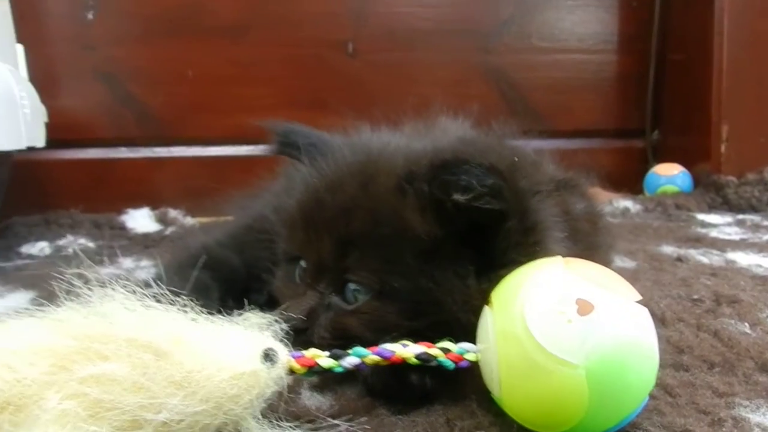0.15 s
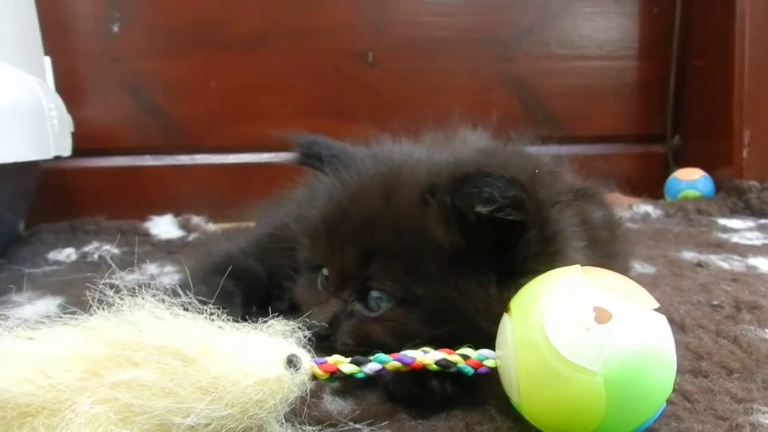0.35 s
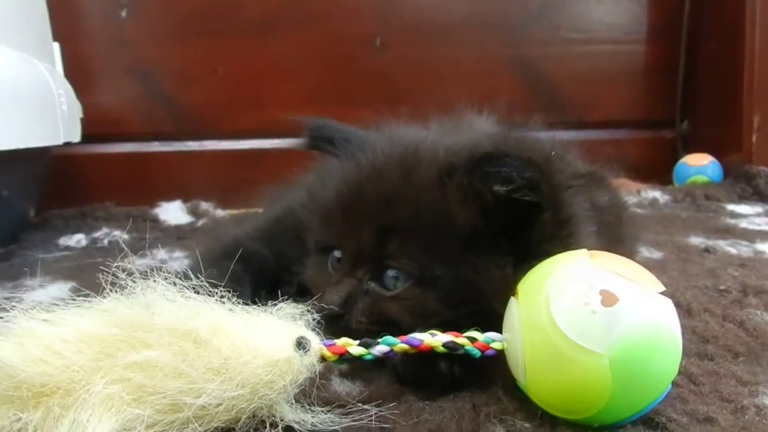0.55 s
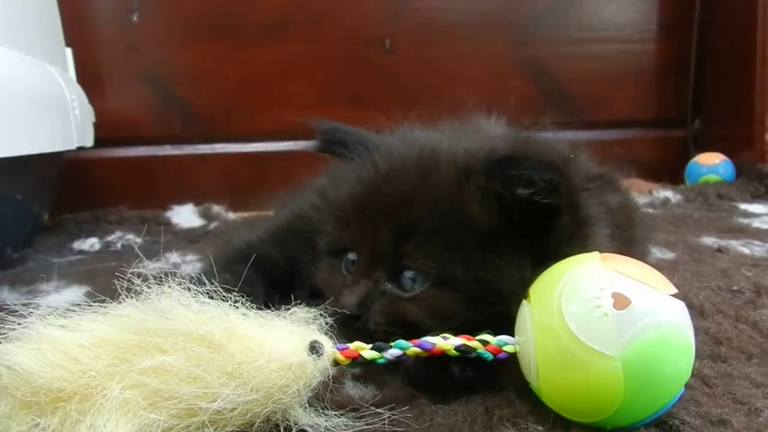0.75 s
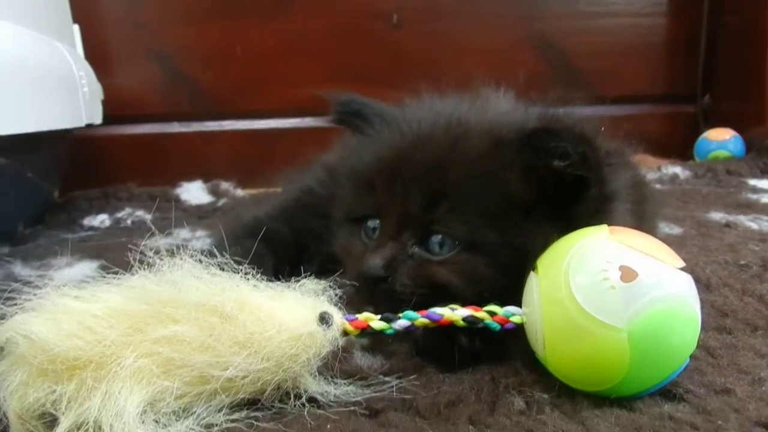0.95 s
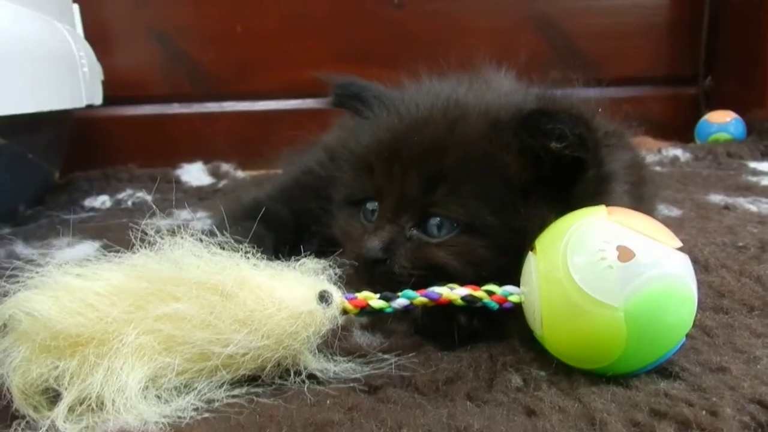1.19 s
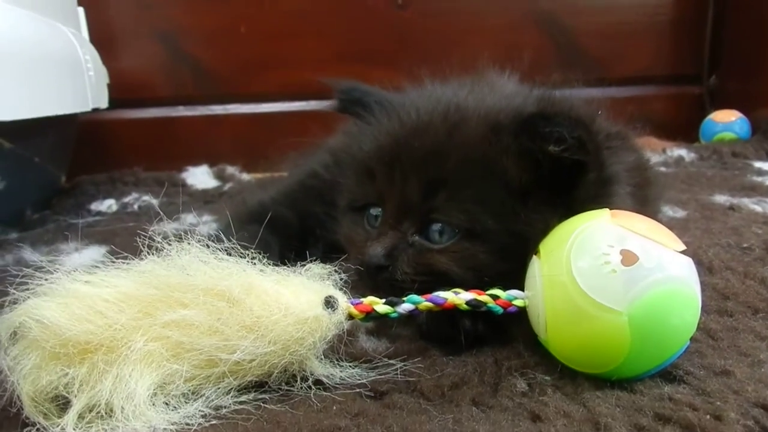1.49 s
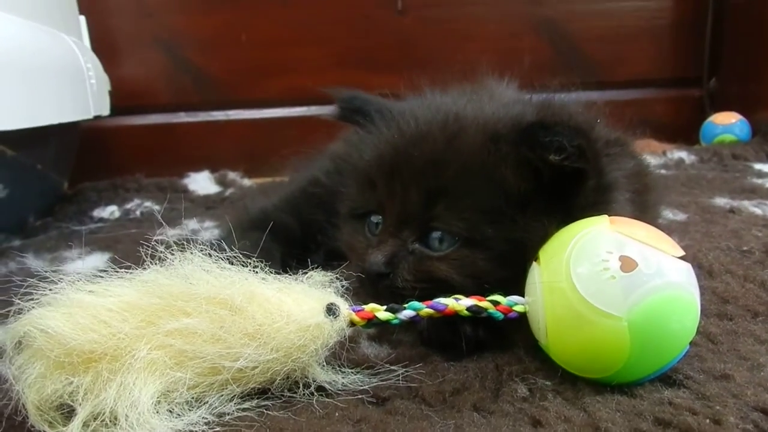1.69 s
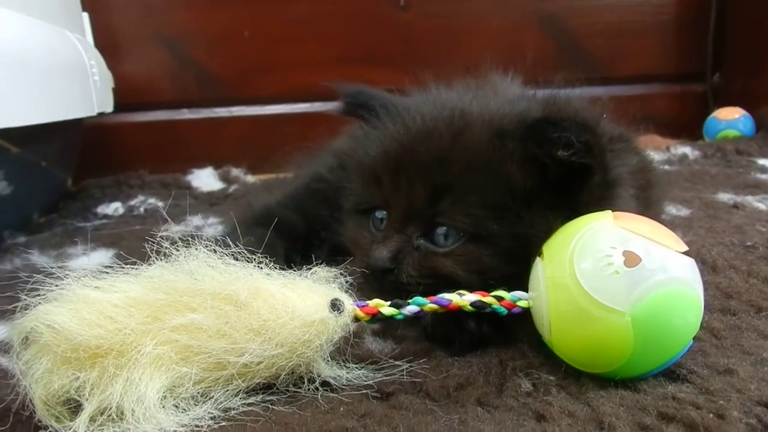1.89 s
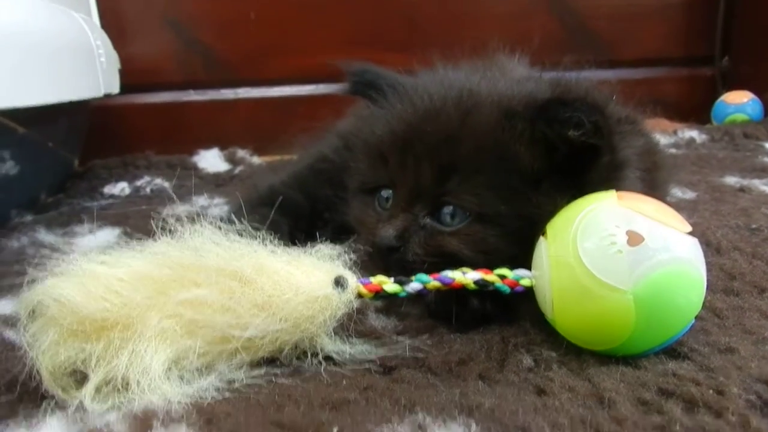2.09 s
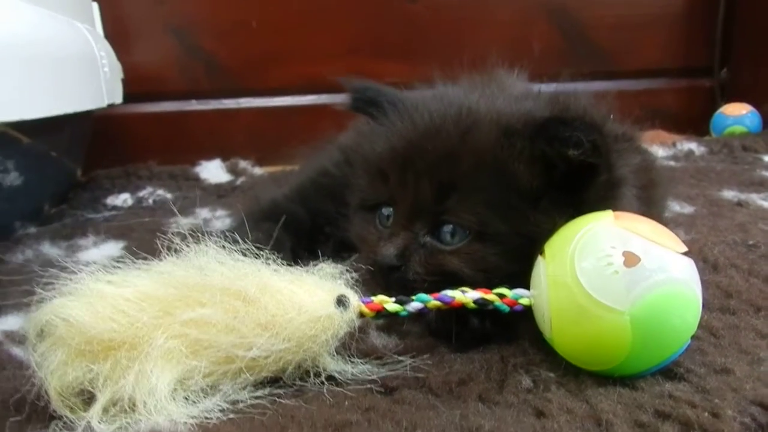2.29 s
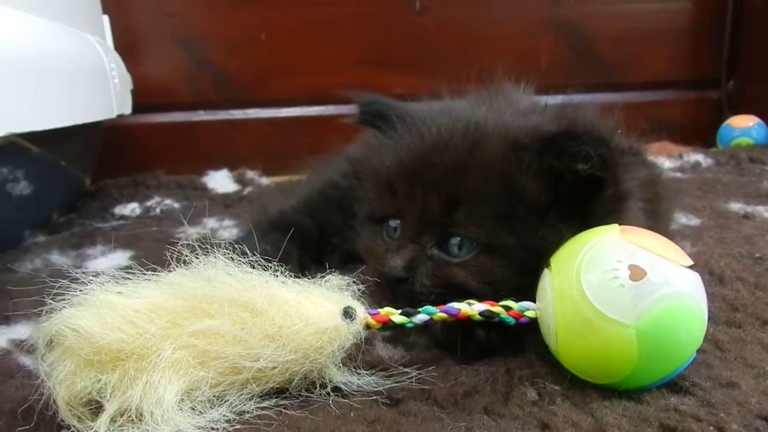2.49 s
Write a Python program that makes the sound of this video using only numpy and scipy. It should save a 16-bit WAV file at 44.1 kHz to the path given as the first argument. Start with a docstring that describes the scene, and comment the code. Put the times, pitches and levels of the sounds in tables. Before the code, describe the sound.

A tiny kitten gives a thin, arching mew, then a higher, louder one ending in a short rasp; dull handling bumps and faint ticks surround them in a quiet carpeted room, close hand-held microphone.

```python
"""Low room rumble with faint hiss runs throughout; soft handling bumps and faint ticks open the scene.
At 0.6 s a young kitten mews close to a hand-held camera: a thin cry that arches in pitch.
More bumps and ticks follow, and at 1.9 s comes a higher, louder mew that ends in a short rasp.
The mews are sums of harmonics coloured by throat and mouth, with air noise; bumps are filtered
impulses, ticks are noise bursts, and the room is shaped stereo noise plus short echoes and a tail."""
import sys
import numpy as np
from scipy import signal
from scipy.fft import rfft, irfft, next_fast_len
from scipy.io import wavfile
from scipy.ndimage import uniform_filter1d

SR = 44100
rng = np.random.default_rng(int(sys.argv[2]) if len(sys.argv) > 2 else 0)


def generate_wav(sig):
    """Save sig (samples, or channels by samples) to the path in sys.argv[1] as 16-bit PCM at SR."""
    pcm = np.round(np.clip(np.atleast_2d(sig).T, -1, 1) * 32767).astype(np.int16)
    wavfile.write(sys.argv[1], SR, pcm)


N = 116865


def amp(db):
    """Decibels to amplitude gain."""
    return 10 ** (np.asarray(db) / 20)


def unit(x):
    """Scales to rms 1."""
    return x / np.sqrt(np.mean(x ** 2) + 1e-20)


def over_hz(points, hz):
    """Reads a spectrum on a log-frequency axis."""
    f, value = np.transpose(points)
    return np.interp(np.log(hz + 1), np.log(f), value)


def over_time(rows, t):
    """Reads every column of a curve."""
    s, *columns = np.transpose(rows)
    return [np.interp(t, s, column) for column in columns]


def add(mix, s, sound):
    """Mixes a sound in at time s."""
    part = mix[round(s * SR):][:len(sound)]
    part += sound[:len(part)]


def wobble(size, hz):
    """Smooth random motion: noise under a Gaussian low-pass of width hz, at rms 1."""
    padded = next_fast_len(size)
    f = np.fft.rfftfreq(padded, 1 / SR)
    spectrum = rfft(rng.standard_normal(padded)) * np.exp(-.5 * (f / hz) ** 2)
    return unit(irfft(spectrum, padded)[:size])


def band(x, low_hz, high_hz):
    """Band-pass with a gentle lower and a steep upper edge."""
    low_cut = signal.butter(2, low_hz, "high", fs=SR, output="sos")
    high_cut = signal.butter(5, min(high_hz, SR / 2 - 1), fs=SR, output="sos")
    return signal.sosfilt(high_cut, signal.sosfilt(low_cut, x))


# pitch of each mew: (time [s], pitch [Hz])
MEW_1_PITCH = [(0.605, 567.5), (0.615, 580.3), (0.627, 662), (0.651, 664.6), (0.665, 696.4), (0.687, 643),
               (0.717, 635.6), (0.743, 657.6), (0.755, 702.7), (0.845, 724.6), (0.853, 697.6), (0.949, 678),
               (1.029, 610), (1.079, 556), (1.115, 537.5), (1.125, 530)]
MEW_2_PITCH = [(1.89, 672.6), (1.904, 691), (1.922, 805), (1.934, 849), (1.944, 847), (1.99, 802.4),
               (2.036, 870.6), (2.1, 1025), (2.15, 1057), (2.204, 996.7), (2.25, 988), (2.272, 934.4),
               (2.336, 787.5), (2.35, 805.8), (2.382, 746), (2.402, 695.6), (2.434, 680.4), (2.48, 584),
               (2.498, 510), (2.51, 503)]
# loudness before VOICE_DB: (time [s], fundamental [dB], overtones [dB], treble overtones [dB])
MEW_1_LEVEL = [(.603,-48.5,-45.5,-50.5),(.63,-58,-50,-73),(.662,-64,-50,-63),(0.668,-59.5,-51,-46.5),(.72,-60,-53.5,-49.5),(.76,-56.5,-50,-46),(.835,-47,-48,-50),(.87,-57,-48.5,-53.5),(.96,-53,-48.5,-50),(1.04,-56,-50.5,-51.5),(1.124,-52,-54.5,-63)]
MEW_2_LEVEL = [(1.888,-46.5,-38.5,-54),(1.923,-49,-43,-37.5),(1.99,-49,-45,-43),(2.03,-45.5,-41.5,-44.5),(2.089,-36,-48.5,-38.5),(2.125,-39,-46.5,-41),(2.17,-38,-46,-40.5),(2.228,-34.5,-50,-40),(2.273,-37.5,-43,-44),(2.305,-46,-35.5,-49.5),(2.35,-47.5,-39,-49.5),(2.41,-45,-43,-51.5),(2.46,-55,-44,-60.5),(2.514,-50,-47.5,-63)]
# moving mouth resonance: (time [s], centre [Hz], relative lift [dB])
MEW_1_MOUTH = [(.605,2600,8),(.645,3080,-14),(.667,5280,26),(.72,5480,19),(.77,5160,24),(.85,5900,-4),(.96,6300,14),(1.03,5660,12),(1.125,3157,2)]
MEW_2_MOUTH = [(1.89,7100,2.2),(1.931,5470,30),(2,5780,14),(2.06,5440,17),(2.1,5000,2.3),(2.16,7150,1.9),(2.24,6530,21),(2.27,5670,4.3),(2.29,3610,6.7),(2.33,3300,10.3),(2.38,2975,4.8),(2.512,2940,1.8)]
# roughness of the voice: (time [s], roughness [0-1])
MEW_1_ROUGHNESS = [(.605,.5),(.63,.12),(.74,.11),(.78,.22),(.84,.36),(.86,.07),(1.125,.1)]
MEW_2_ROUGHNESS = [(1.89,.35),(1.915,.11),(2.05,.08),(2.26,.07),(2.32,.18),(2.45,.22),(2.48,.7),(2.512,.9)]
# throat colour of the overtones: (frequency [Hz], relative level [dB])
THROAT_COLOUR = [(1000,1),(1300,2.5),(1600,6.5),(2000,-6),(2350,-16),(2900,-6),(3450,-2),(3900,-8),(4500,-18.5),(5150,-10.5),(6100,-6),(7200,-14),(8000,-15.5),(9400,-12),(10900,-23.5),(12200,-32),(15500,-57)]
MOUTH_WIDTH_HZ, TREBLE_FROM_HZ = 280, 3820
ATTACK_S, RELEASE_S = 0.006, 0.0041
JITTER, SHIMMER = 0.033, 0.24  # rms shares of pitch and level at full roughness
FLUTTER = 0.00404  # rms share of pitch, always present
DOUBLING_RAD = 0.18  # at full roughness
RASP_AT_HZ, RASP_WIDTH_HZ = 5000, 420
AIR_DB, AIR_FULL_HZ = -10, 9500
WAVER_DB, WAVER_HZ = 2, 28.6
VOICE_DB = 2


def mew(pitch, level, mouth, roughness):
    """Harmonics of the vocal folds pass throat and mouth; roughness shakes them and air blurs the highest."""
    t = np.arange(level[0][0], level[-1][0], 1 / SR)
    size = len(t)
    (hz,), (rough,) = over_time(pitch, t), over_time(roughness, t)
    base_db, overtone_db, treble_db = over_time(level, t)
    mouth_hz, lift_db = over_time(mouth, t)
    k = np.arange(1, 25)[:, None]  # harmonic numbers
    f = k * hz

    # throat and mouth shape the overtones; each register is then set to its own level
    mouth_db = lift_db / (1 + ((f - mouth_hz) / MOUTH_WIDTH_HZ) ** 2)
    colour = amp(over_hz(THROAT_COLOUR, f) + mouth_db) * (k > 1)
    high = .5 + .5 * np.tanh((f - TREBLE_FROM_HZ) / 250)
    gain = (k == 1) * amp(base_db)
    for share, db in ((1 - high, overtone_db), (high, treble_db)):
        register = colour * share
        gain = gain + amp(db) * register / np.linalg.norm(register, axis=0)
    waver = np.array([wobble(size, WAVER_HZ) for _ in k])
    gain = gain * amp(WAVER_DB * np.minimum(f / RASP_AT_HZ, 1) * waver)

    shake = JITTER * rough * wobble(size, hz=160) + FLUTTER * wobble(size, hz=40.5)
    phase = 2 * np.pi * np.cumsum(hz * (1 + shake)) / SR
    phase = phase + DOUBLING_RAD * rough * np.sin(phase / 2)  # alternate cycles differ when rough
    # random starting phase per harmonic, so the pulses are less peaky
    offset = 2 * np.pi * rng.random(k.shape)

    # random sidebands: rasp grows with roughness, air with frequency
    rasp = np.array([wobble(size, RASP_WIDTH_HZ) + 1j * wobble(size, RASP_WIDTH_HZ) for _ in k])
    smear = rough * f / RASP_AT_HZ + amp(AIR_DB) * np.minimum(f / AIR_FULL_HZ, 1) ** 3
    folds = (np.exp(1j * (k * phase + offset)) * (1 + smear * rasp)).real
    folds = folds / np.sqrt(.5 + smear ** 2)  # even power at any smear

    cry = (gain * folds).sum(0) + hiss(base_db)
    gate = np.clip((t - t[0]) / ATTACK_S, 0, 1) * np.clip((t[-1] - t) / RELEASE_S, 0, 1)
    shimmer = 1 + SHIMMER * rough * wobble(size, hz=120)
    return t[0], cry * gate * shimmer


# air noise ringing the throat: (frequency [Hz], relative level [dB per Hz])
HISS_COLOUR = [(700,-21),(1200,-8),(1600,-4),(2000,-10),(2400,-19),(3000,-5),(3450,-10),(3900,-13),(4550,-18),(5200,-13),(5800,-26),(7500,-27),(9400,-19),(12500,-41),(16000,-48)]
HISS_DB = -18  # against the fundamental at its loudest
HISS_FOLLOW = .8  # dB of hiss per dB of fundamental


def hiss(effort_db):
    """Air noise in the throat's resonances; it grows with the effort of the cry."""
    size = len(effort_db)
    hz = np.fft.rfftfreq(size, 1 / SR)
    white = rfft(rng.standard_normal(size))
    air = unit(irfft(white * amp(over_hz(HISS_COLOUR, hz)), size))
    top_db = effort_db.max()
    return air * amp(HISS_DB + top_db + HISS_FOLLOW * (effort_db - top_db))


# handling bumps: (time [s], peak level before the lean [dB], upper edge [Hz], lower edge [Hz])
HANDLING_BUMPS = [(0.076,-44.5,1290,400),(.188,-37.5,300,60),(.238,-33,157,90),(0.278,-38,550,120),(0.306,-35,199,55),(0.366,-40,168,55),(.438,-31.5,257,70),(0.451,-38,131,65.4),(.914,-33.5,608,140),(0.923,-38,222,70),(0.948,-35,141,60.4),(0.9976,-31.5,310,109),(1.184,-36.5,399,90.65),(1.236,-39,160,60),(1.2775,-25,810,68.4),(1.8075,-33.5,1140,300),(1.967,-26.5,910,108),(2.335,-43,460,170),(2.394,-32,357,220.6),(2.462,-38,224,55),(2.510,-37,1110,140.3)]
BUMP_TAIL_GAIN, BUMP_TAIL_S = 0.5 * amp(-21), 0.015
BUMP_LEAN_DB = -3  # left minus right


def bump(start, db, high_hz, low_hz):
    """A dull push on the camera body: a filtered impulse with a brief noisy shudder after it."""
    t = np.arange(0, .1, 1 / SR)
    push = BUMP_TAIL_GAIN * np.exp(-t / BUMP_TAIL_S) * rng.standard_normal(len(t))
    push[0] = 1
    thud = band(push, low_hz, high_hz)
    return start, amp(db) * thud / abs(thud).max()


# small ticks and rustles, likely fur, toy and lips:
# (time [s], noise level before the envelope [dB], centre [Hz], upper edge over centre [ratio], decay [s])
SMALL_TICKS = [(.076,-42,950,1.1,0.0047),(0.148,-47,1100,1.15,0.01),(0.1908,-39.5,1170,1.27,0.006),(.193,-44.5,5000,1.5,0.0045),(.235,-52,860,1.5,0.0064),(.305,-39,990,1.1,0.006),(0.599,-33.5,2280,1.8,.0015),(1.015,-43.5,700,1.4,0.014),(1.279,-46.5,4540,1.8,.005),(1.35,-49.5,4450,2.3,.012),(1.879,-42,900,2.6,0.0088),(1.888,-32.5,1120,1.17,0.0083)]
TICK_RISE = 0.23  # rise time as a share of decay


def tick(start, db, hz, spread, decay):
    """A tiny burst of friction: band-passed noise with a fast rise and a slower decay."""
    t = np.arange(0, .06, 1 / SR)
    noise = band(rng.standard_normal(2 * len(t)), hz / spread, hz * spread)
    noise = unit(noise[len(t):])  # skip the filter's onset
    envelope = np.exp(-t / decay) * (1 - np.exp(-t / (TICK_RISE * decay)))
    return start, amp(db) * envelope * noise


# the kitten's side in the direct sound: (frequency [Hz], left minus right [dB])
SIDE_LEAN = [(600,1.5),(1000,1.5),(1600,1),(2900,8),(4200,5),(5500,9),(7000,18),(9000,8),(13000,7)]
# echoes off floor, toy and door: (delay [s], left [dB], right [dB])
SURFACE_ECHOES = [(.0013,-44,-30.5),(.0031,-26.5,-22.5),(.0056,-28,-23.5)]
RIGHT_LAG_S = .000075


def at_microphones(x):
    """The direct sound leans left and reaches the right later; nearby surfaces add short echoes."""
    size = next_fast_len(N + 4096)
    hz = np.fft.rfftfreq(size, 1 / SR)
    lean = amp(np.outer([.5, -.5], over_hz(SIDE_LEAN, hz)))
    lean = lean / np.sqrt((lean ** 2).mean(0))  # same total power at every frequency
    path = lean * np.exp(-2j * np.pi * np.outer([0, RIGHT_LAG_S], hz))
    for delay, left_db, right_db in SURFACE_ECHOES:
        path = path + amp([[left_db], [right_db]]) * np.exp(-2j * np.pi * hz * delay)
    return irfft(rfft(x, size) * path, size)[:, :N]


ROOM_DB, ROOM_T60_S = -12, 0.42


def room(x):
    """Short tail of a carpeted room: decaying noise, different at each microphone."""
    t = np.arange(SR // 2) / SR
    decay = np.exp(-np.log(1000) * t / ROOM_T60_S)
    build_up = np.clip(t / 0.01, 0, 1) ** 2
    tail = rng.standard_normal((2, len(t))) * decay * build_up
    tail = tail / np.linalg.norm(tail[0])
    return amp(ROOM_DB) * signal.fftconvolve(x[None], tail, axes=1)[:, :N]


# room background colour: (frequency [Hz], relative level [dB per Hz])
ROOM_COLOUR = [(15, -67), (25, -26.5), (59, -4), (91, 6), (126, -6.5), (227, -0.5), (297, -5), (368, -6.5),
               (445, -9), (509, -8.5), (666, -10.5), (895, -12), (1380, -14.5), (1530, -16), (3000, -27),
               (4260, -24.5), (8350, -29.5), (11800, -29), (15500, -33)]
# left-right likeness of the background: (frequency [Hz], correlation [-1 to 1])
STEREO_LIKENESS = [(60, 0.58), (180, 0.75), (550, 0.52), (1650, 0.45), (4970, -0.13), (15000, -0.36)]
# swell of the low rumble, fading out above its edge: (time [s], relative level [dB])
RUMBLE_SWELL = [(0,-1),(.3,0.5),(.52,-0.5),(.8,0.5),(.96,0.5),(1.1,0.5),(1.25,1),(1.36,-0.5),(1.7,2.5),(2.1,0.5),(2.4,3),(2.65,0.5)]
FLOOR_DB = -47.5  # rms of the whole background
RUMBLE_EDGE_HZ, PATCHY_DB = 460, 0.5


def background():
    """Room rumble and faint hiss as shaped noise; the low end swells as the camera moves."""
    frames, hz = N // 512 + 5, np.fft.rfftfreq(2048, 1 / SR)
    a, b, c, d, patches = rng.standard_normal((frames, len(hz), 5)).T
    patches = uniform_filter1d(patches, size=14, axis=0)
    patches = unit(uniform_filter1d(patches, size=5, axis=1))
    swell, = over_time(RUMBLE_SWELL, np.arange(frames) * 512 / SR)
    low = 1 / (1 + (hz[:, None] / RUMBLE_EDGE_HZ) ** 2)
    same = np.clip(over_hz(STEREO_LIKENESS, hz), -1, 1)[:, None]
    left = a + 1j * b
    right = same * left + np.sqrt(1 - same ** 2) * (c + 1j * d)
    level_db = over_hz(ROOM_COLOUR, hz)[:, None] + low * (swell + PATCHY_DB * patches)
    spectrum = np.array([left, right]) * amp(level_db)
    noise = signal.istft(spectrum, nperseg=2048, noverlap=1536)[1][:, :N]
    return amp(FLOOR_DB) * unit(noise)


def scene():
    """Two mews, bumps and ticks over the room background."""
    kitten, bumps, ticks = np.zeros((3, N))
    add(kitten, *mew(MEW_1_PITCH, MEW_1_LEVEL, MEW_1_MOUTH, MEW_1_ROUGHNESS))
    add(kitten, *mew(MEW_2_PITCH, MEW_2_LEVEL, MEW_2_MOUTH, MEW_2_ROUGHNESS))
    for row in HANDLING_BUMPS:
        add(bumps, *bump(*row))
    for row in SMALL_TICKS:
        add(ticks, *tick(*row))
    near = amp(VOICE_DB) * kitten + ticks
    handling = bumps * amp([[BUMP_LEAN_DB / 2], [-BUMP_LEAN_DB / 2]])
    return at_microphones(near) + room(near + bumps) + handling + background()


CUTOFF_HZ = 15750


def record(dry):
    """The recorder's band limit: a steep low-pass."""
    low_pass = signal.firwin(1023, CUTOFF_HZ, window=("kaiser", 9), fs=SR)
    return signal.oaconvolve(dry, low_pass[None], "same")


dry = scene()
out = record(dry)
generate_wav(out)
```